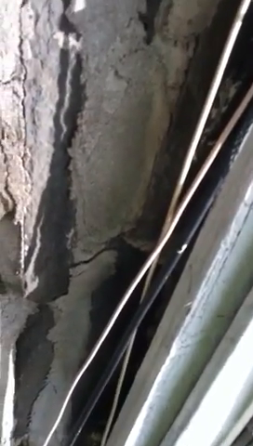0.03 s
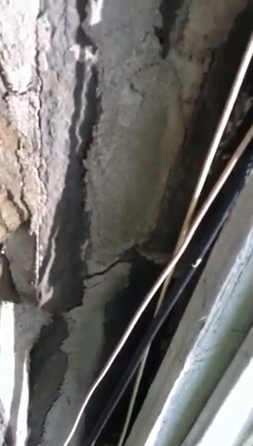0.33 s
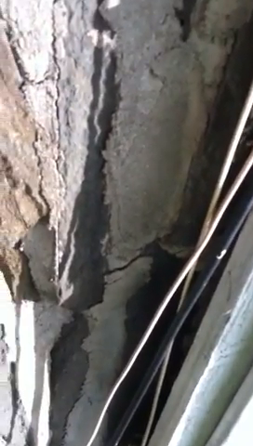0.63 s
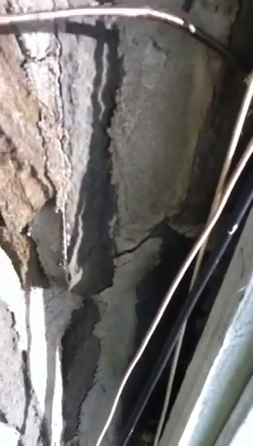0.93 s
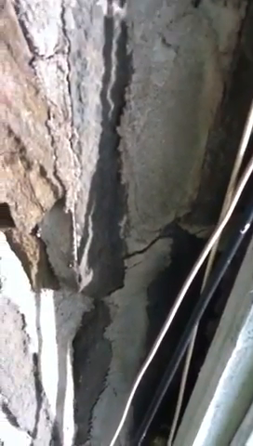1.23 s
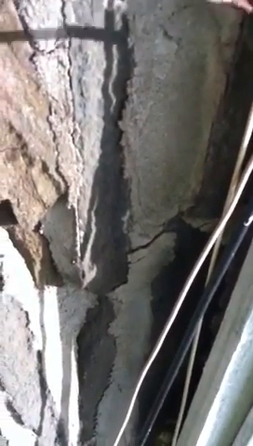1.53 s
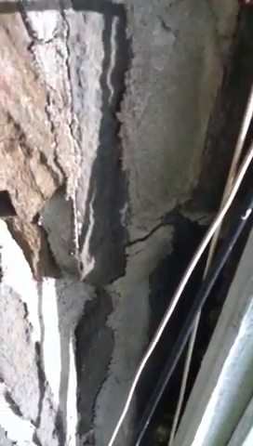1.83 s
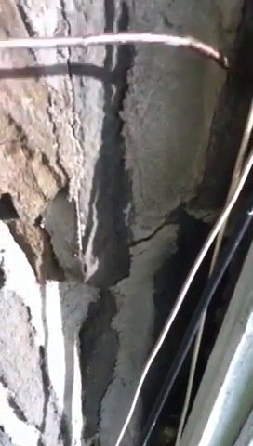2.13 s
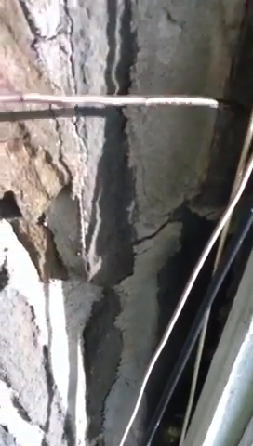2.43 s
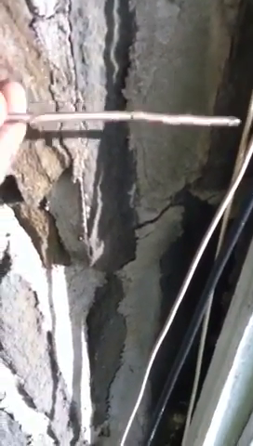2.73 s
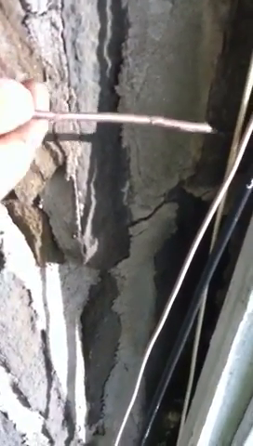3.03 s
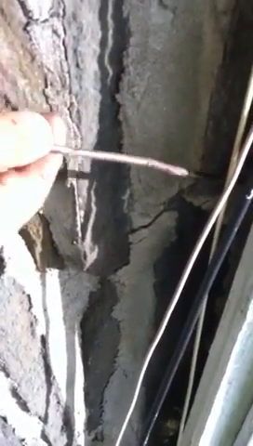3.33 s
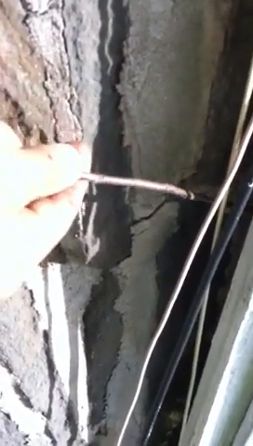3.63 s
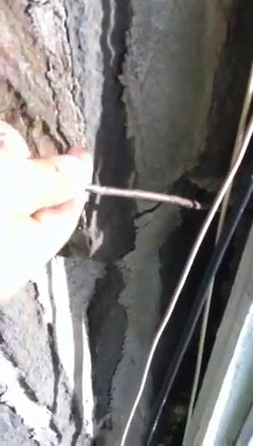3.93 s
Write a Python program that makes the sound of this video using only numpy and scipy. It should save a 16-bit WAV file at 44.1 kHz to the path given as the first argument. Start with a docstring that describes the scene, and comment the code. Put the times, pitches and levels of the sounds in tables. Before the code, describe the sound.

A bat calls close by from a gap in tree bark, giving sharp, very high ticking chirps about five times a second for the whole four seconds. A few carry a soft dull pop, clearest at about 1 second. Underneath lie a quiet outdoor rumble and faint dry rustling, with two barely audible distant bird whistles near 2.1 and 2.8 seconds.

```python
"""A small animal, probably a bat, scolds about five times a second from a gap in tree bark.
Each call is a frequency sweep: a very high whistle that opens with a click and a soft puff, dives
within milliseconds and often ends in a second falling flick. Some calls hold a dull thump or a break
to a lower register. Reflections in the crevice smear the calls, and a faint outdoor echo follows.
Behind them lie two far whistles, a quiet outdoor rumble and faint dry rustling."""
import sys
import numpy as np
from scipy import signal
from scipy.fft import rfft, irfft
from scipy.io import wavfile
from scipy.ndimage import uniform_filter1d

SR = 44100
rng = np.random.default_rng(int(sys.argv[2]) if len(sys.argv) > 2 else 0)


def wav_record(signal):
    """Record a signal, one row per channel, as 16-bit PCM in the file named by sys.argv[1]."""
    frames = np.transpose(np.atleast_2d(signal))
    bounded = np.clip(frames, -1, 1)
    # unit amplitude maps onto the largest positive 16-bit level
    quanta = np.round(bounded * 32767).astype(np.int16)
    wavfile.write(sys.argv[1], SR, quanta)


N = 176400


def diving_whistles():
    """Frequency modulation: each accented whistle dives, turns and rasps as it glides to its end."""
    # Main notes (start [s], length [ms], turn pitch [Hz], end pitch [Hz],
    # attack level [dB], held level [dB], rasp level [dB], puff level [dB])
    notes = [(0.1514, 16.6, 10240, 15700, -17.5, -19, -38, -41.5),
             (0.3822, 13, 10540, 14650, -16.5, -18, -33.5, -45),
             (0.6045, 8.9, 10850, 11430, -16, -18, -45, -46),
             (0.8415, 6.6, 8370, 8030, -16.5, -29.5, -46, -45),
             (1.0280, 6.7, 9270, 8700, -23, -29.5, -39, -46),
             (1.2535, 16.5, 11330, 13640, -20, -22.5, -50, -40.5),
             (1.4588, 8.6, 10300, 10520, -16.5, -27, -32, -41),
             (1.692, 8.26, 8850, 8840, -17, -26.5, -35.5, -45),
             (1.9094, 11.6, 11370, 13450, -14, -24.5, -32, -40.5),
             (2.1558, 6.5, 12470, 10950, -20.5, -21.5, -45.5, -38),
             (2.3423, 19, 12120, 12850, -16, -23, -50.5, -39.5),
             (2.5458, 9.5, 9980, 11530, -22, -24.5, -39, -45),
             (2.7527, 13.3, 12850, 13460, -17, -19.5, -58.5, -44),
             (2.9676, 9.16, 11060, 9430, -17, -25.5, -58, -44),
             (3.1798, 8.9, 10600, 9250, -17.5, -27.5, -44.5, -46.5),
             (3.407, 11.4, 11310, 13600, -14, -23.5, -32, -46.5),
             (3.6080, 9.4, 10470, 11200, -19, -26.5, -36, -55),
             (3.8020, 3.9, 11250, 11300, -32, -27, -50.5, -59),
             (3.9985, 8, 10700, 11150, -23.5, -25, -52, -54)]
    # Spectrum of the rasp (frequency [Hz], relative level [dB])
    rasp_spectrum = [(60, -50), (500, -12), (1000, -20.5), (2400, -20.5), (3200, -29.5), (4100, -19.5),
                     (4900, -19), (6800, -24), (7900, 1.5), (9000, -4.5), (11000, 6.5), (16000, -29)]
    start_hz, dive_ms, attack_ms = 15570, 5.4, 1.48
    out, ms = np.zeros(N), note_clock()
    for start, length, turn_hz, end_hz, attack_db, held_db, rasp_db, puff_db in notes:
        dive = np.cos(np.pi / 2 * np.clip(ms / dive_ms, 0, 1)) ** 2
        glide = smooth_step((ms - dive_ms) / max(length - dive_ms, 1))
        hz = turn_hz + (start_hz - turn_hz) * dive + (end_hz - turn_hz) * glide
        level_db = held_db + (attack_db - held_db) * bell(ms - attack_ms, width_ms=1.6)
        tone = whistle(hz) * gain(level_db) * gate(ms, length, attack_ms)
        onset = gain(attack_db - 15) * click(ms - 1.25)
        rasp_at_ms = min(8.6, length - 1)
        rasp = gain(rasp_db) * burst(rasp_spectrum, ms - rasp_at_ms, width_ms=2.53)
        add_note(out, start, crevice(tone + onset + rasp) + gain(puff_db) * air_puff(ms))
    return out


def closing_flicks():
    """Downward sweeps: a short whistle swells in and falls ever faster, with a soft click and puff."""
    # Closing notes (start [s], length [ms], start pitch [Hz], end pitch [Hz], level [dB])
    notes = [(.1690, 3.2, 15500, 13800, -18), (0.4, 2.6, 15500, 13700, -17),
             (0.6244, 2.7, 15180, 13770, -28), (1.0454, 2.9, 15410, 13550, -14.5),
             (1.271, 2.38, 15400, 13600, -14.5), (1.4784, 2.7, 15100, 14000, -19.5),
             (1.7120, 2.5, 15330, 14220, -22.5), (1.9305, 2.3, 15500, 13950, -41.5),
             (2.5660, 3.4, 16200, 14000, -26.5), (2.7670, 5.2, 13700, 13400, -24),
             (2.9843, 3.6, 15700, 13300, -17.5), (3.1950, 5.1, 14900, 12340, -14),
             (3.4175, 7.6, 14460, 12360, -23), (3.6270, 3.7, 16800, 10200, -22),
             (3.814, 2.7, 15100, 14080, -19), (3.8154, 6.2, 14200, 13600, -16.5)]
    out, ms = np.zeros(N), note_clock()
    for start, length, from_hz, to_hz, db in notes:
        hz = from_hz + (to_hz - from_hz) * np.clip(ms / length, 0, 1) ** 1.4
        tone = whistle(hz) * gate(ms, length, attack_ms=1.8)
        flick = crevice(tone + gain(-26) * click(ms)) + gain(-29) * air_puff(ms)
        add_note(out, start, gain(db) * flick)
    return out


def voice_breaks():
    """Register breaks: in three long calls the voice drops to a low tone with a stronger octave."""
    # Breaks (start [s], fundamental [Hz], level of the octave [dB])
    breaks = [(0.1606, 3950, -25.5), (1.2620, 4000, -24.5), (3.4136, 4050, -32)]
    out, ms = np.zeros(N), note_clock()
    for start, hz, db in breaks:
        phase = rough_phase(hz, len(ms))
        tone = np.sin(2 * phase) + gain(-14) * np.sin(phase)
        add_note(out, start, crevice(gain(db) * tone * gate(ms, length_ms=2.7, attack_ms=1.0)))
    return out


def whistle(hz):
    """Amplitude modulation: a rough tone and the hiss it carries flutter together in loudness."""
    # Spectrum of the hiss (frequency [Hz], relative level [dB])
    hiss_spectrum = [(60, -56.5), (200, -20), (500, -11), (1000, -14), (3000, -23), (4400, -11.5),
                     (6500, -34), (8200, -10), (10500, -8.5), (13000, 1.5), (14500, -3.5), (16000, -16.5)]
    tone = np.sin(rough_phase(hz, len(hz)))
    flutter_db = np.minimum(wander(len(hz), ms=1.3), 1)
    return gain(flutter_db) * (tone + gain(-23.5) * noise(hiss_spectrum, len(hz)))


def rough_phase(hz, size, jitter=0.02):
    """Phase is the integral of frequency; random jitter of the frequency roughens the voice."""
    return 2 * np.pi * np.cumsum(hz * (1 + jitter * wander(size, ms=0.4))) / SR


def click(ms):
    """A broadband transient: noise this brief is heard as a click."""
    # Spectrum of the click (frequency [Hz], relative level [dB])
    spectrum = [(40, -36.5), (150, -10.5), (400, -3.5), (900, -1.5), (2200, -6), (3200, -10.5), (4400, 1),
                (5700, -5.5), (7800, 2), (9400, 15.5), (11500, -5.5), (14000, 3.5), (16000, -7.5)]
    return burst(spectrum, ms, width_ms=1)


def air_puff(ms):
    """A pressure pulse and band-shaped noise: one low swing inside a dull, hollow rush of air."""
    # Spectrum of the rush (frequency [Hz], relative level [dB])
    rush_spectrum = [(40, -16), (130, -7.5), (250, -8.5), (520, 12), (900, 4.5), (2000, -1.5), (6000, -13)]
    from_peak_ms = ms - 2.12
    rush = burst(rush_spectrum, from_peak_ms, width_ms=3.9)
    return pulse(from_peak_ms, width_ms=1.003) + gain(-11.5) * rush


def thumps():
    """Impulsive sound: two pressure pulses and a dry crack merge into a dull pop inside the gap."""
    # Pops within the calls (time [s], level [dB])
    pops = [(0.6238, -42.5), (1.0424, -26.5), (1.4789, -40.5), (1.7077, -36.5), (1.7123, -35.5),
            (1.9283, -45), (2.5629, -38), (2.5662, -49)]
    # Spectrum of the dry edge (frequency [Hz], relative level [dB])
    crack_spectrum = [(100, -16), (700, -6), (2500, 5), (5000, -10.5), (16000, -30.5)]
    out, ms = np.zeros(N), note_clock()
    for time, db in pops:
        body = pulse(ms, width_ms=0.73) + 0.66 * pulse(ms, width_ms=0.34)
        crack = gain(-13) * burst(crack_spectrum, ms, width_ms=1)
        add_note(out, time, crevice(gain(db) * (body + crack)))
    return out


def crevice(x):
    """Interference: reflections off close bark walls colour each note a little differently."""
    return x + gain(-10.5) * echoes(x, t60_s=0.015)


def echoes(x, t60_s):
    """Diffuse reverberation: convolution with exponentially decaying noise of unit energy."""
    t = np.arange(int(t60_s * SR) + 2) / SR
    response = rng.standard_normal(len(t)) * np.exp(-np.log(1000) * t / t60_s)
    return signal.fftconvolve(x, response / np.linalg.norm(response))[:len(x)]


def far_whistles():
    """Multipath propagation blurs two thin, distant notes, probably a bird's."""
    # Far notes (start [s], length [s], start pitch [Hz], end pitch [Hz], level [dB])
    notes = [(2.056, 0.087, 4230, 4400, -69.5), (2.844, 0.1, 4240, 4150, -74)]
    out, t = np.zeros(N), np.arange(N) / SR
    for start, length, from_hz, to_hz, db in notes:
        progress = np.clip((t - start) / length, 0, 1)
        hz = (from_hz + (to_hz - from_hz) * progress) * (1 + 0.00848 * wander(N, ms=4))
        out += gain(db) * np.sin(np.pi * progress) * np.sin(2 * np.pi * np.cumsum(hz) / SR)
    return out + 0.5 * echoes(out, t60_s=0.24)


def outdoor_rumble():
    """Ambient noise: a distant, nearly steady rumble, weighted to low frequencies."""
    # Spectrum of the rumble (frequency [Hz], relative level [dB])
    spectrum = [(15, -40.5), (25, -7.5), (49, -25.5), (125, 3.5), (150, 3.5), (243, 1.5), (344, -4),
                (621, -6), (790, 3.5), (1060, -6), (1420, -5), (2020, -11), (3180, -23), (4500, -24.5),
                (10600, -33.5), (13800, -36), (15000, -46.5)]
    return noise(spectrum, N) * gain(-57 + 0.29 * wander(N, ms=85))


def rustle():
    """Modulated noise: quick random swings of level give the grain of dry bark and leaves."""
    # Spectrum of the rustle (frequency [Hz], relative level [dB])
    spectrum = [(300, -23.5), (2000, -5.5), (4300, -2.5), (8000, -3.5), (11000, -14.5), (16000, -34)]
    # Slow envelope of the rustle (time [s], level [dB])
    envelope = [(0, -78), (.8, -79), (1.12, -70), (1.32, -73.5), (1.5, -69), (1.699, -77), (2.0, -74.5),
                (2.42, -67), (2.7, -77.5), (3.2, -77), (4, -96)]
    level_db = np.interp(np.arange(N) / SR, *np.array(envelope).T)
    return noise(spectrum, N) * gain(level_db + 4 * wander(N, ms=3.9) + 2.2 * wander(N, ms=25))


def gain(db):
    """Amplitude ratio of a level in decibels."""
    return 10 ** (np.asarray(db) / 20)


def unit_rms(x):
    """Normalisation to rms 1."""
    return x / np.sqrt(np.mean(x ** 2))


def noise(spectrum, size):
    """Spectral shaping: noise of rms 1 coloured by (frequency [Hz], relative level [dB]) points."""
    hz, db = np.array(spectrum, float).T
    bin_hz = np.maximum(np.fft.rfftfreq(size, 1 / SR), 1)
    colour = gain(np.interp(np.log(bin_hz), np.log(hz), db))
    return unit_rms(irfft(rfft(rng.standard_normal(size)) * colour, size))


def wander(size, ms):
    """Random fluctuation of rms 1: noise smoothed twice by a moving average."""
    span = max(int(ms * SR / 1000), 1)
    return unit_rms(uniform_filter1d(uniform_filter1d(rng.standard_normal(size), span), span))


def bell(ms, width_ms):
    """Gaussian envelope around time zero."""
    return np.exp(-0.5 * (ms / width_ms) ** 2)


def burst(spectrum, ms, width_ms):
    """Coloured noise under a Gaussian envelope."""
    return bell(ms, width_ms) * noise(spectrum, len(ms))


def pulse(ms, width_ms):
    """One compression of the air between two rarefactions."""
    return (1 - (ms / width_ms) ** 2) * bell(ms, width_ms)


def smooth_step(progress):
    """Raised-cosine ramp from 0 to 1."""
    return np.sin(np.pi / 2 * np.clip(progress, 0, 1)) ** 2


def gate(ms, length_ms, attack_ms, release_ms=2.6):
    """Note envelope: a smooth rise, a hold, and a release centred on the note's end."""
    return smooth_step(ms / attack_ms) * smooth_step(0.5 + (length_ms - ms) / release_ms)


def note_clock():
    """Time [ms] around the start of one note."""
    return np.arange(-512, 2560) * 1000 / SR


def add_note(out, start_s, note):
    """Superposition: a note joins the track with the zero of its clock at start_s."""
    first = int(start_s * SR + note_clock()[0] * SR / 1000)
    part = note[:max(len(out) - first, 0)]
    out[first:first + len(part)] += part


def scene():
    """Sound pressures add: the calls, their outdoor echo, the thumps and the background, in mono."""
    voice = diving_whistles() + closing_flicks() + voice_breaks()
    outdoor_echo = gain(-30) * echoes(voice, t60_s=0.25)
    return (voice + outdoor_echo + thumps() + far_whistles() + outdoor_rumble() + rustle())[None]


def record(dry):
    """Band limiting: a gentle high-pass thins the deep bass and a steep low-pass cuts the top."""
    bass_hz, top_hz = 60, 15800
    thinned = signal.sosfilt(signal.butter(1, bass_hz, "high", fs=SR, output="sos"), dry)
    return signal.sosfilt(signal.ellip(8, 0.2, 70, top_hz, fs=SR, output="sos"), thinned)


dry = scene()
out = record(dry)
wav_record(out)
```